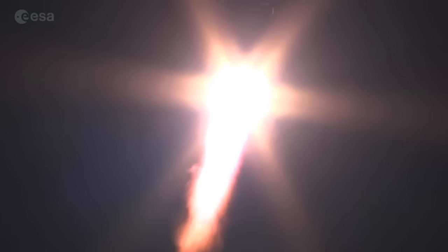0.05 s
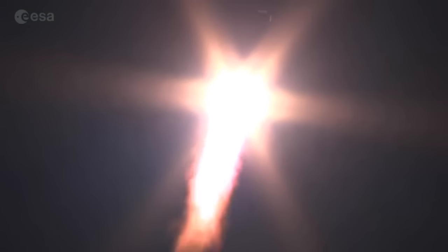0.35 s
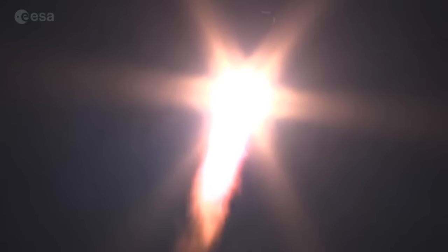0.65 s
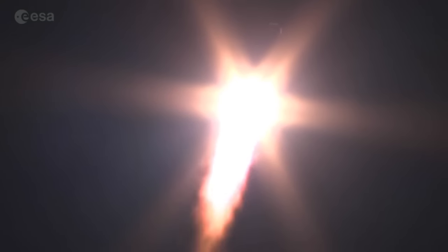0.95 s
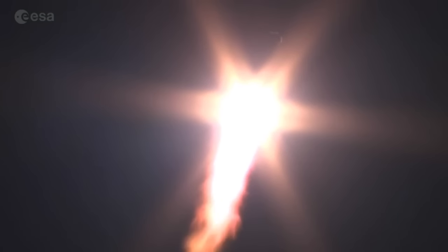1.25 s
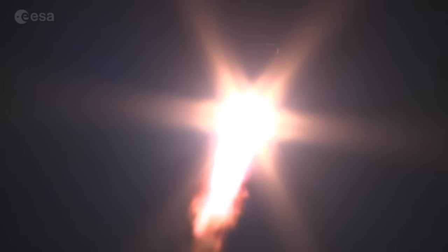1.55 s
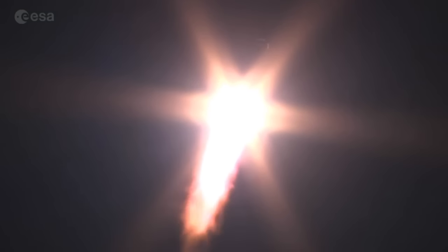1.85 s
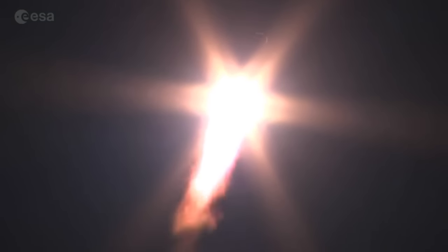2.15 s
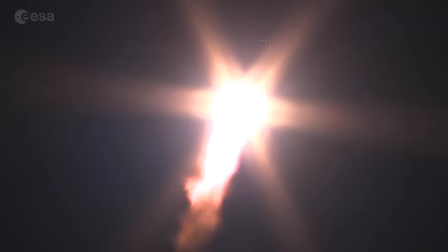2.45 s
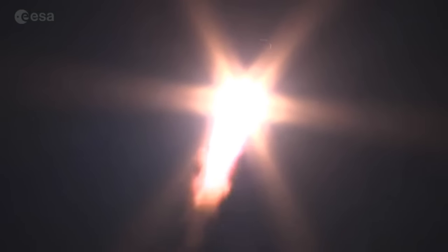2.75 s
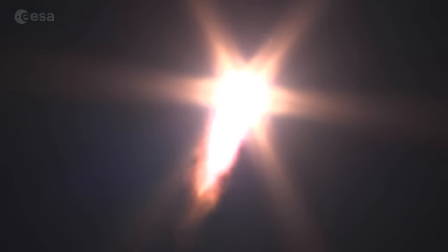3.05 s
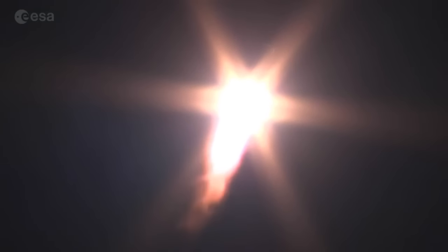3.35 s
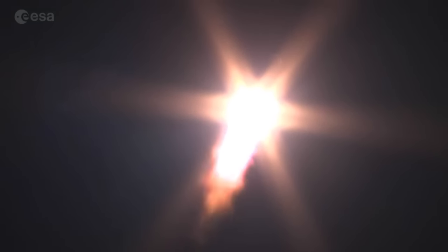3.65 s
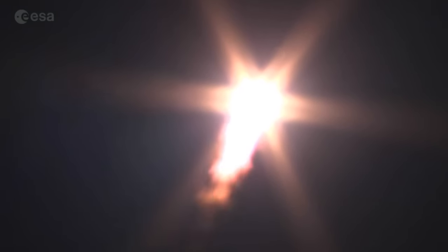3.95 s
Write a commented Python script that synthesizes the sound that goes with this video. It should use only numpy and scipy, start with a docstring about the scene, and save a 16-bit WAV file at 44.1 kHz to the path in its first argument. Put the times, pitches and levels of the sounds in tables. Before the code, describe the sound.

A rocket climbs away in the distant sky with a deep, continuous rumble and a surging, crackling roar. The microphone overloads with a slight rasp, and the level eases a little halfway through.

```python
"""Distant rocket climbing away

The turbulent exhaust gives a deep rumble and a surging roar, with a fine crackle of weak shocks and
clusters of sharper cracks. The sound overloads the recorder: the tallest waves are cut flat and rasp.
Halfway through, the level eases down by about two decibels."""
import sys
import numpy as np
from scipy import signal
from scipy.fft import rfft, irfft
from scipy.io import wavfile
from scipy.ndimage import uniform_filter1d

SR = 44100
rng = np.random.default_rng(int(sys.argv[2]) if len(sys.argv) > 2 else 0)


def dump_mix(stems):
    """Bounce the given channels to the path in sys.argv[1] as a 16-bit WAV at rate SR."""
    frames = np.atleast_2d(stems).T  # one column per channel
    limited = np.clip(frames, -1, 1)  # hard clip at full scale
    pcm = np.round(limited * 32767).astype(np.int16)
    wavfile.write(sys.argv[1], SR, pcm)


N = 176400
TIME, HZ = np.arange(N) / SR, np.arange(N // 2 + 1) * SR / N
DEEP_TOP_HZ, RUMBLE_TOP_HZ, ROAR_TOP_HZ = 112.7, 291.3, 657  # crossovers between the jet's layers


def rumble():
    """The body of the jet: low turbulence that rolls louder and softer."""
    # The rumble's swells. Each row: time in seconds, relative level in dB.
    swells = [(0.0, -34.5), (0.32, -29.5), (0.96, -32), (1.04, -29.5), (1.52, -31.5), (1.76, -28),
              (1.92, -34.5), (2.16, -30.5), (2.32, -32), (2.4, -31), (2.56, -31.5), (2.64, -30),
              (2.96, -32.0), (3.04, -30.5), (3.36, -32.6), (3.44, -31), (3.68, -31), (4.0, -31)]
    return from_db(-31 + 0.74 * swing_db(swells)) * turbulence(DEEP_TOP_HZ, RUMBLE_TOP_HZ)


def roar(burst_db):
    """Midrange turbulence: slow swells with the jet's surges on top."""
    # The roar's swells. Each row: time in seconds, relative level in dB.
    swells = [(0.0, -33.5), (0.56, -38.5), (0.88, -36), (1.04, -37.0), (1.68, -37.5), (1.76, -36),
              (2.32, -37), (2.4, -34.5), (2.48, -36), (2.56, -38), (2.64, -38.3), (2.88, -37.5),
              (3.04, -37), (3.28, -38.5), (3.76, -38), (4.0, -42.6)]
    return from_db(-33 + swing_db(swells) + burst_db) * turbulence(RUMBLE_TOP_HZ, ROAR_TOP_HZ)


def bursts_db(flutter_per_s=76):
    """The jet surges in short tearing bursts and flutters; returns boosts for roar and treble."""
    # The surges. Each row: centre in seconds, length in seconds, roar boost in dB, treble boost in dB.
    surges = [(0.157, 0.016, 4, 4.5), (0.218, 0.043, 1, 3.5), (0.345, 0.022, 2.5, 0.5),
              (0.505, 0.026, 9.5, 2), (0.654, 0.045, 3, 1), (0.729, 0.045, 4.5, -0.8),
              (0.878, 0.018, 7.5, 3.5), (0.975, 0.012, 1.5, 2.0), (1.036, 0.015, 4.5, 0.5),
              (1.144, 0.045, 2.3, -2), (1.326, 0.04, 7, 2.5), (1.4, 0.032, 4, 2.5), (1.58, 0.042, 4.5, 0.5),
              (1.691, 0.024, 4.5, 0.5), (1.771, 0.012, 4.5, 0.5), (1.868, 0.045, 3, 2.2),
              (1.95, 0.045, 4, 0.5), (2.022, 0.044, 2, -0.5), (2.1, 0.027, 4.5, 1), (2.305, 0.022, 5, 2),
              (2.528, 0.025, 2, 2.1), (2.79, 0.045, 0.8, 0.3), (2.943, 0.045, 1.3, 1.3),
              (3.107, 0.04, 4.5, 4), (3.162, 0.015, -2, 2.5), (3.233, 0.032, 3.5, 1.5),
              (3.325, 0.045, 2.5, 0), (3.487, 0.045, 1.5, 3.3), (3.554, 0.013, 4, 3.5),
              (3.609, 0.045, 2, 3.5), (3.721, 0.041, 6.5, 4.5), (3.81, 0.045, 3, 4.5),
              (3.879, 0.024, 4.5, 3.9), (3.964, 0.044, 9.5, 4.5)]
    flutter_db = 0.66 * drift(flutter_per_s)
    roar_db, treble_db = 0.37 * flutter_db, flutter_db
    for centre, length, roar_boost, treble_boost in surges:
        bell = np.exp(-np.minimum(2 * ((TIME - centre) / length) ** 2, 20))
        roar_db = roar_db + roar_boost * bell
        treble_db = treble_db + treble_boost * bell
    return roar_db, treble_db


def deep_bass():
    """The weight under the rumble: the jet's lowest turbulence, slowly heaving."""
    # The bass swells. Each row: time in seconds, relative level in dB.
    swells = [(0.0, -37), (0.24, -47.5), (0.4, -45), (0.88, -42.5), (0.96, -46.5), (1.52, -42.0),
              (1.76, -49), (1.84, -41), (2.08, -40), (2.4, -43.5), (2.64, -43), (2.8, -46), (3.2, -44.3),
              (3.36, -46), (3.44, -44), (4.0, -47.5)]
    return from_db(-33 + 0.74 * swing_db(swells)) * turbulence(0.94, DEEP_TOP_HZ)


def treble(burst_db):
    """The jet's top end: turbulent hiss and crackle swell and surge together."""
    # The treble's swells. Each row: time in seconds, relative level in dB.
    swells = [(0.0, -50), (0.24, -59), (0.32, -51.5), (0.56, -55.5), (0.8, -54.5), (1.6, -55.5),
              (1.84, -55), (2.08, -54.5), (2.16, -55.5), (2.32, -58.5), (2.4, -57), (3.36, -56.5),
              (3.68, -58.5), (4.0, -60.2)]
    hiss = from_db(-34.5) * turbulence(ROAR_TOP_HZ, SR)
    return from_db(0.49 * swing_db(swells) + burst_db) * (hiss + from_db(-37) * crackle())


def crackle(shocks_per_s=700, spread_db=4):
    """Weak shocks of uneven size arrive at random."""
    sizes = from_db(spread_db * np.minimum(rng.exponential(1, N), 4))
    signs = rng.choice([-1, 1], N)
    arrivals = rng.random(N) < shocks_per_s / SR
    return exhaust_band(sizes * signs * arrivals, ROAR_TOP_HZ, SR)


def cracks(count=3, length_s=0.003, relax_hz=600, air_loss_hz=6000):
    """Each crack is a few shock fronts in close succession: the pressure jumps up and falls back."""
    # The sharpest cracks. Each row: start in seconds, relative level in dB.
    hits = [(0.1045, -57), (0.1441, -58), (0.1584, -58), (0.2006, -56.5), (0.2994, -58), (0.4225, -58),
            (0.4943, -58), (0.509, -55), (0.645, -58), (0.741, -58), (0.819, -58), (0.8639, -56.5),
            (0.875, -58), (1.0355, -57), (1.25, -57), (1.3117, -60), (1.3304, -54), (1.3902, -58.5),
            (1.5864, -58), (1.6994, -56.5), (1.728, -62), (1.739, -56), (1.7659, -57), (1.8152, -59),
            (1.858, -60), (1.8756, -58), (2.017, -55), (2.1186, -58.5), (2.247, -58.5), (2.7824, -57.5),
            (3.1175, -54), (3.1472, -58), (3.1604, -57), (3.2227, -55.5), (3.707, -57)]
    starts, levels_db = np.transpose(hits)
    lags = length_s * (np.arange(count) + rng.random((len(starts), count))) / count
    arrivals = ((starts[:, None] + lags) * SR).astype(int)
    fronts = np.zeros(N)
    fronts[arrivals] = from_db(levels_db + 10)[:, None]
    decay = np.exp(-2 * np.pi * relax_hz / SR)
    pressure = signal.lfilter([1], [1, -decay], fronts + 1e-18)
    return signal.lfilter(*signal.butter(1, air_loss_hz, fs=SR), pressure)  # air rounds the fronts


def turbulence(low_hz, high_hz, steady_s=0.12):
    """Smooth mixing noise of the jet in one band, its slow level held steady."""
    noise = exhaust_band(rng.standard_normal(N), low_hz, high_hz)
    local_power = uniform_filter1d(noise ** 2, int(steady_s * SR))
    return noise * np.sqrt(np.mean(noise ** 2) / local_power)


def exhaust_band(source, low_hz, high_hz):
    """Give a white source the exhaust's dark colour at about rms 1, then keep one band of it."""
    # The exhaust's spectrum. Each row: frequency in Hz, relative spectral density in dB.
    spectrum = [(45, -43.5), (65, -10.5), (100, -5), (125, 0.5), (180, -1.5), (210, 0.5), (260, -3),
                (360, -6), (500, -12.5), (1000, -26.5), (2000, -39), (3000, -48.5), (5200, -56.5),
                (6200, -62), (11000, -72.5)]
    points_hz, points_db = np.transpose(spectrum)
    hz = np.maximum(HZ, 1)
    colour = rms_one(from_db(np.interp(np.log(hz), np.log(points_hz), points_db)))
    band = below(low_hz, hz, order=6) * below(hz, high_hz, order=6)
    return irfft(rfft(rms_one(source)) * colour * band, N)


def swing_db(contour):
    """Swing of a level contour about its mean, with the overall fade taken out."""
    level = np.interp(TIME, *np.transpose(contour)) - fade_db()
    return level - level.mean()


def fade_db():
    """The overall level eases down once, halfway through."""
    return np.interp(TIME, [2.07, 2.75], [0, -1.9])


def drift(rate_hz):
    """A smooth random wander with rms 1."""
    return rms_one(irfft(rfft(rng.standard_normal(N)) * below(HZ, rate_hz, order=2), N))


def below(hz, edge_hz, order):
    """Gain of a low-pass; with the two frequencies swapped, of a high-pass."""
    return 1 / np.sqrt(1 + (hz / edge_hz) ** (2 * order))


def from_db(db):
    """Decibels to gain."""
    return 10 ** (np.asarray(db) / 20)


def rms_one(x):
    """Scale to rms 1."""
    return x / np.sqrt(np.mean(x ** 2) + 1e-20)


def scene():
    """One jet in mono, layered from bass to treble; the higher layers surge and crack."""
    roar_db, treble_db = bursts_db()
    return (deep_bass() + rumble() + roar(roar_db) + treble(treble_db) + cracks())[None]


def record(dry):
    """The overloaded input rounds and clips the waves; the level eases down, lows and top are cut."""
    knee, ceiling = from_db(-14), from_db(-26.2)
    clipped = np.clip(knee * np.tanh(dry / knee), -ceiling, ceiling)
    edge = 0.004 * SR
    soft_ends = np.interp(np.arange(N), [0, edge, N - edge, N], [0, 1, 1, 0])
    faded = clipped * from_db(fade_db()) * soft_ends
    bass_cut = below(30, np.maximum(HZ, 1), order=2)
    top_cut = below(HZ, 12200, order=2) * below(HZ, 12000, order=60)  # gentle dulling, then a wall
    return irfft(rfft(faded) * bass_cut * top_cut, N)


dry = scene()
out = record(dry)
dump_mix(out)
```